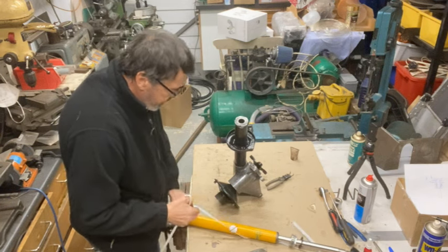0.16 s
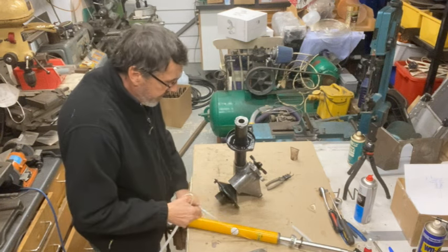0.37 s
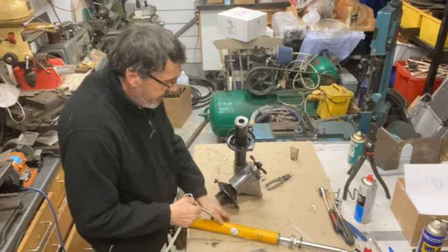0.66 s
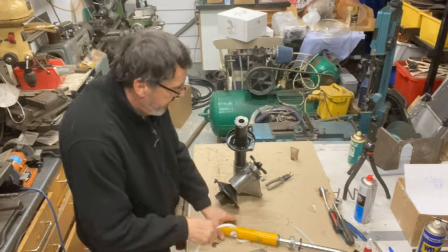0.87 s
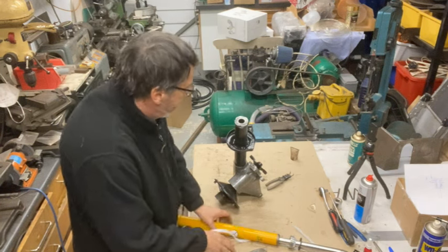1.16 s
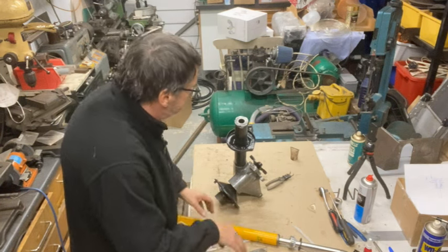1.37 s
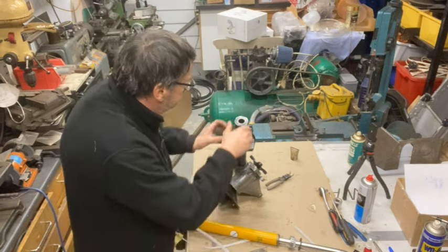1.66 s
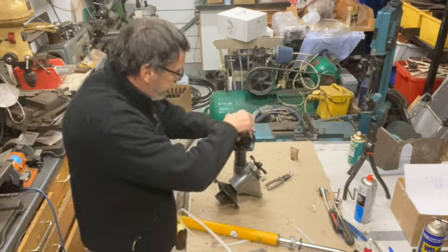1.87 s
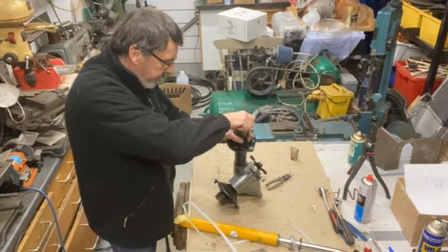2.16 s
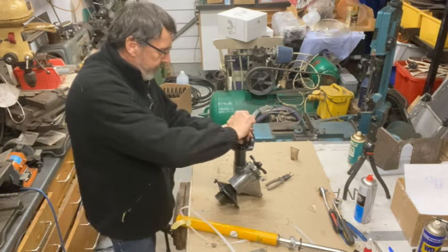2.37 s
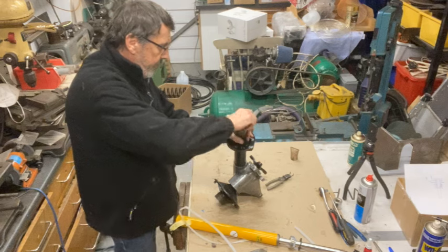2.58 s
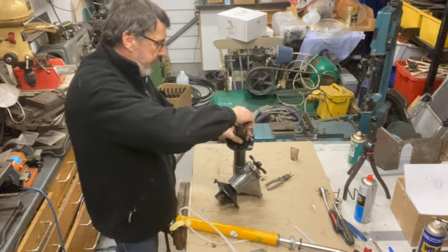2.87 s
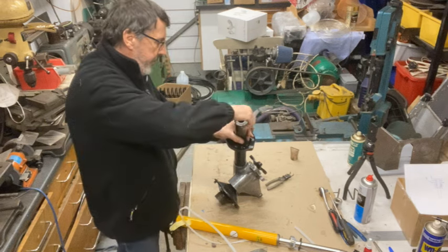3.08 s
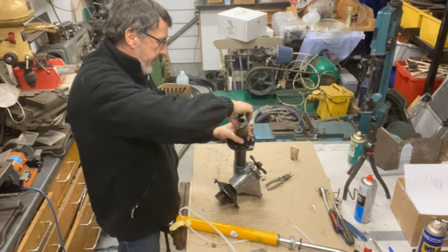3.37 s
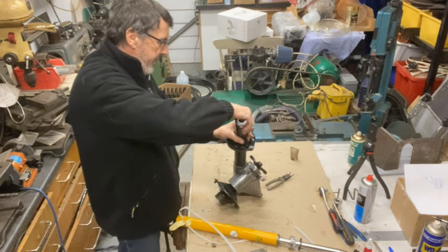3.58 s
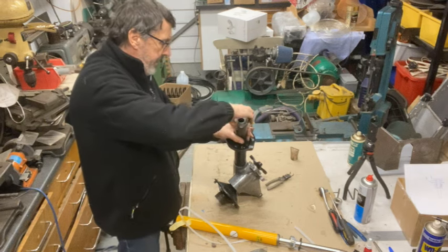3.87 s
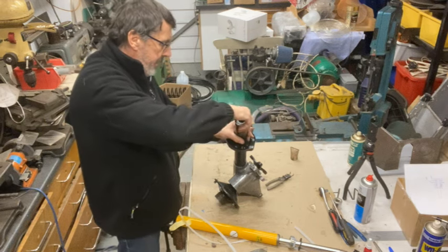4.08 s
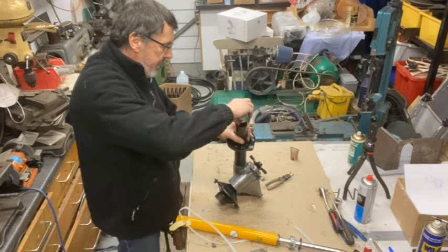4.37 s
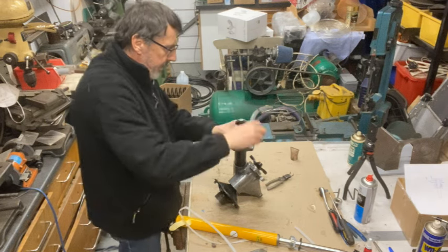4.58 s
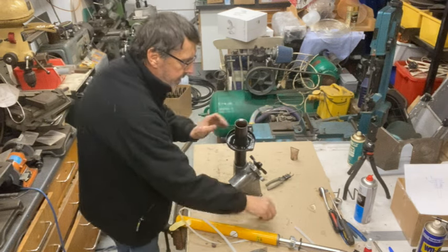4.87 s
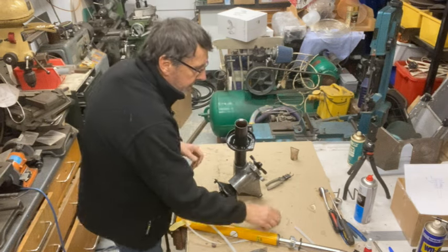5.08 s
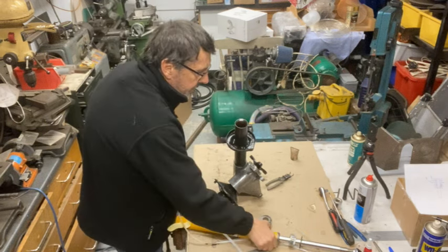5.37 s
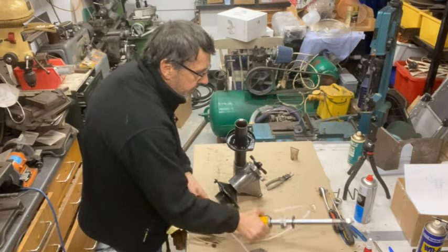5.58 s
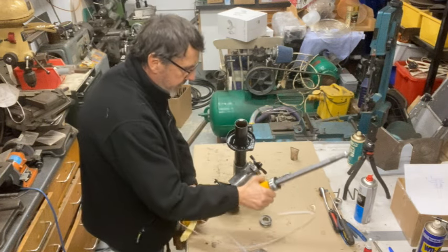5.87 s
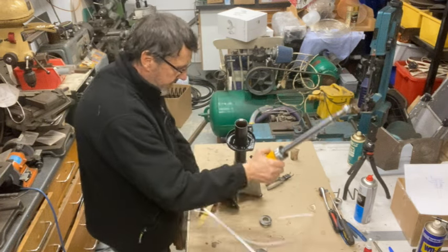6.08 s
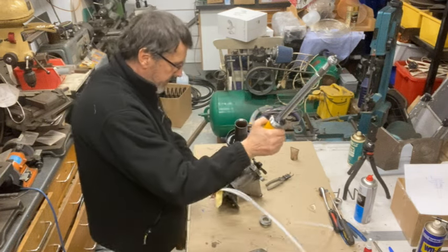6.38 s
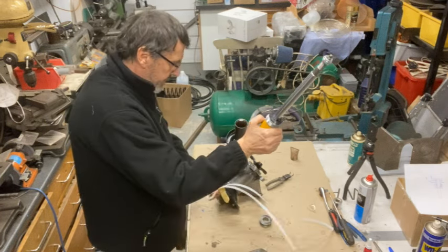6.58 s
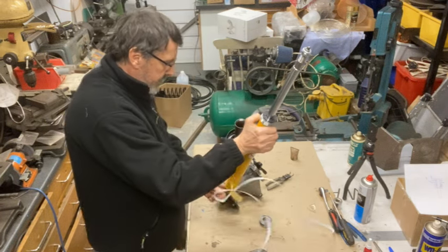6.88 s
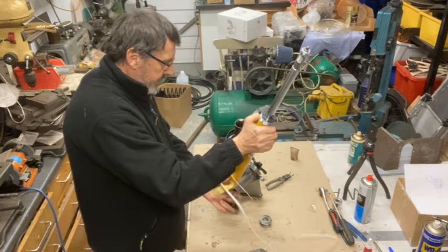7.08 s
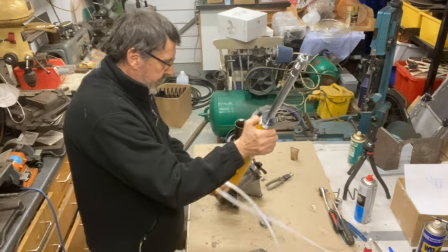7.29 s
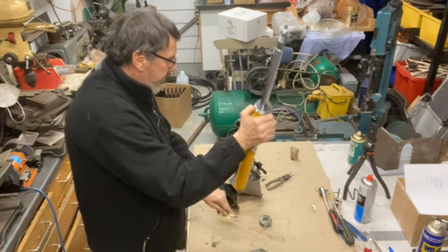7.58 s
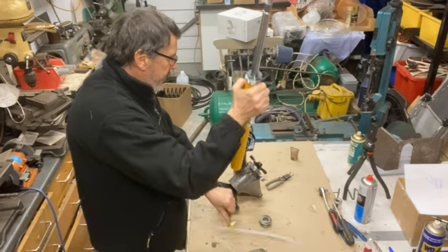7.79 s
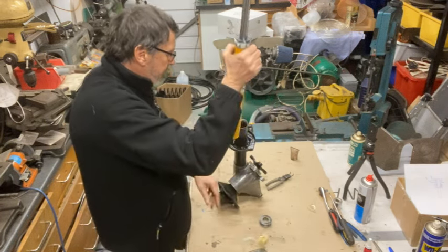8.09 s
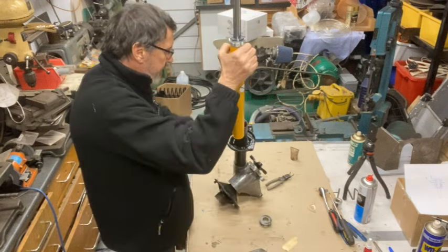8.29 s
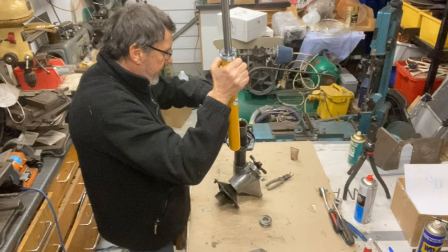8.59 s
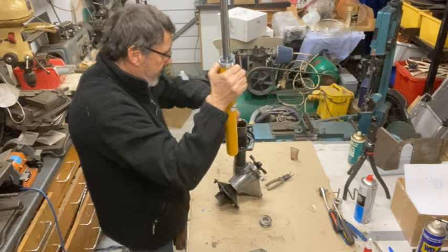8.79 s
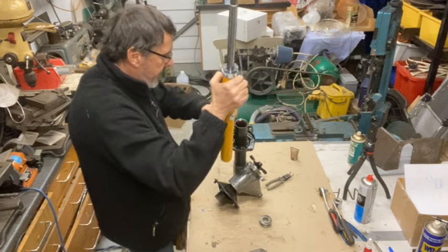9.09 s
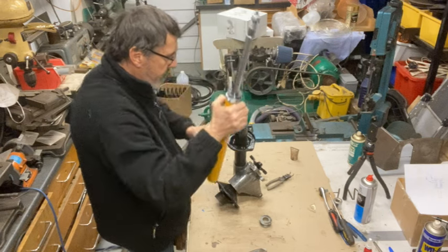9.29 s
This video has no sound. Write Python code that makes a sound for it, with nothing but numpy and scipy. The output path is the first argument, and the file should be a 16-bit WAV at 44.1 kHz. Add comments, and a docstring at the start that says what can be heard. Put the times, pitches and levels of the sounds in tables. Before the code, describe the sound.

In a small cluttered workshop, light taps and metallic rasps give way to a loud burst of clanks, clinks, thumps and gritty sliding.

```python
"""Handling suspension parts on a workbench

Metal parts knock, skid and scuff on a wooden bench: short noise bursts, slides and wooden thumps.
A steel collar rasps down a strut tube, a nut clinks and a damper clanks: fading sine tones ring the metal.
A loose hose scuffs along, grit crackles and tight parts squeak in a small, cluttered workshop.
A low rumble of filtered noise lies under everything."""
import sys
import numpy as np
from scipy import signal
from scipy.fft import rfft, irfft, next_fast_len
from scipy.io import wavfile
from scipy.ndimage import uniform_filter1d

SR = 44100
rng = np.random.default_rng(int(sys.argv[2]) if len(sys.argv) > 2 else 0)


def unload_audio(sound):
    """Save the sound as a 16-bit wav file, at the path given as the first command line argument."""
    columns = np.transpose(np.atleast_2d(sound))
    # keep every value between -1 and 1, then stretch to whole-number steps
    steps = np.round(np.clip(columns, -1, 1) * 32767)
    wavfile.write(sys.argv[1], SR, steps.astype(np.int16))


N = 415863
TIME = np.arange(N) / SR  # clock of the whole scene, in s
RING = np.arange(SR // 2) / SR  # half-second clock of a single hit, in s

# parts and sleeves sliding over the bench, relative levels:
# (start t/s, length/s, grit level/dB, dull rubbing level/dB)
SLIDES = [(0.0, 0.013, -60, -58), (0.106, 0.069, -58.5, -63), (0.249, 0.14, -55, -51.5),
          (0.714, 0.066, -53, -59.5), (0.872, 0.14, -58, -89), (1.069, 0.26, -57, -59.5),
          (2.242, 0.12, -63.5, -57.5), (3.731, 0.28, -78, -50.5), (4.08, 0.15, -75, -43.5),
          (5.25, 0.085, -52, -47.5), (5.345, 0.1, -41.5, -49), (5.445, 0.11, -47, -47.5),
          (5.586, 0.097, -51, -36.5), (5.664, 0.08, -39, -53), (5.783, 0.17, -56, -61.5),
          (6.018, 0.074, -45, -60.5), (6.13, 0.0735, -43, -57), (6.654, 0.067, -58.5, -64.5),
          (6.83, 0.033, -52.5, -69), (6.958, 0.04, -52.5, -49), (7.027, 0.06, -50, -45),
          (7.157, 0.071, -46, -55), (7.43, 0.113, -47.5, -62), (7.66, 0.25, -57.5, -63),
          (8.167, 0.081, -50.5, -48.5), (8.342, 0.21, -55.5, -46.5), (8.582, 0.25, -79, -52),
          (8.888, 0.0072, -49.5, -72), (8.924, 0.16, -49.5, -56), (9.146, 0.33, -69.5, -70.5)]


def knocks(swell_db=-16):
    """A few milliseconds of soft noise swell into each blow; it bounces once; light blows chatter longer."""
    # parts knocking on the bench; hard contacts click, soft ones sound the wood:
    # (t/s, level/dB, hardness/dB, clack f/Hz)
    blows = [(0.14, -32.5, 1, 3020), (0.151, -30, 1, 2730), (0.176, -38, -11, 1200), (0.288, -36, -20, 760),
             (0.399, -41.5, -15, 820), (0.612, -46.5, 1, 1480), (0.647, -44, 15, 1295),
             (0.793, -44.5, 5, 1285), (1.031, -28.5, 10, 2200), (1.046, -26.5, -17, 1400),
             (1.075, -30.5, -10, 1020), (1.080, -21, -8.5, 2200), (1.188, -38.5, 17, 1120),
             (1.241, -43.5, 6, 1210), (1.268, -31, 3, 1390), (1.538, -62.5, -10, 1620),
             (1.627, -57, -7, 895), (4.926, -24, -10.5, 1160), (5.057, -35.5, -7.5, 1150),
             (5.111, -35.5, -9, 1310), (5.199, -22, -1.5, 1540), (5.329, -34, -12, 1140),
             (5.374, -24, 20, 2090), (5.408, -22.5, -5, 1700), (5.577, -20, -24, 905),
             (5.592, -19.5, -21, 734), (5.640, -27, -21, 1305), (5.674, -9.5, 18, 1530),
             (5.848, -28.5, 12, 1280), (5.952, -28.5, -14, 1370), (6.022, -25.5, -21, 1500),
             (6.163, -33.5, 20, 1320), (6.207, -30, 20, 1280), (6.223, -23.5, 0.5, 1830),
             (6.339, -45.5, -8.5, 1610), (6.512, -41, 9, 980), (6.565, -38.5, 9, 1450),
             (6.574, -45, 1, 2310), (6.873, -36.5, 23, 1760), (6.959, -21.5, -15, 1190),
             (7.014, -26, 0, 1510), (7.039, -19, -2, 1180), (7.043, -30.5, -2, 1950), (7.1, -26, -12, 1510),
             (7.104, -24.5, -18, 1880), (7.129, -36, -12.5, 1900), (7.154, -29, -6, 1540),
             (7.222, -32, 14, 1810), (7.402, -17, -0.5, 1340), (7.409, -22.5, -9, 1720),
             (7.491, -32, -18, 1330), (7.521, -29, -1, 1480), (7.560, -14.5, -4, 1440),
             (7.57, -25.5, -16, 1440), (7.595, -30, -3, 2200), (7.667, -33, -3, 1840),
             (7.674, -29.5, 9, 2630), (7.724, -27.5, -1, 990), (7.73, -28, 15, 838),
             (7.781, -34.5, 7, 1550), (7.914, -32.5, 13, 1230), (8.215, -33.5, 16, 1030),
             (8.237, -27, -4, 1000), (8.897, -22, 9, 1230), (8.92, -27.5, 2, 2000)]
    firm_db, firm_decay_s = -25.5, 0.0025
    tenfold_db = 59.5  # a blow this much lighter gets ten times the decay time
    bounce_s, bounce_db, bounce_hardness_db = 0.012, -23, -23  # delay and changes of the softer second touch
    lead_s = 0.004
    out = np.zeros(N)
    lead = np.linspace(0, 1, int(lead_s * SR))
    for s, db, hardness_db, hz in blows:
        decay_s = firm_decay_s * 10 ** ((firm_db - db) / tenfold_db)
        add(out, s, contact(db, hardness_db, hz, decay_s))
        bounce = contact(db + bounce_db, hardness_db + bounce_hardness_db, hz, decay_s)
        add(out, s + bounce_s, bounce)
        soft_noise = band(rng.standard_normal(len(lead)), 900, 7000, order=1)
        add(out, s - lead_s, unit(soft_noise) * lead * undb(db + swell_db))
    return out


def skids():
    """A nudged part grates for a moment before it comes to rest."""
    # parts that skid briefly: (t/s, level/dB, hardness/dB, clack f/Hz)
    nudges = [(0.265, -36, -28, 1390), (0.5, -40, 13, 1380), (0.665, -37, 27.5, 1320),
              (2.075, -47.5, 12, 1960), (2.109, -46.5, -5, 2330), (2.151, -38, -2, 2440),
              (2.323, -39.5, -31, 1490), (8.166, -38.5, -2, 1390), (8.506, -27, -4.5, 1840),
              (8.787, -36.5, 11, 2760)]
    out = np.zeros(N)
    for s, db, hardness_db, hz in nudges:
        add(out, s, contact(db, hardness_db, hz, decay_s=0.012))
    return out


def contact(db, hardness_db, hz, decay_s, click_share_db=-7, clack_share_db=-6, body_share_db=-11):
    """Click, pitched clack and slower wooden body; hardness shares the energy between click and body."""
    hard = undb(hardness_db)
    width = np.clip(0.21 * hz / 1400, .1, .7)  # small, high-pitched contacts are the most damped
    pitched = unit(band(burst(decay_s), hz / (1 + width), hz * (1 + width)))
    broad = unit(band(burst(decay_s), 780, 3400))
    clack = blow(pitched + undb(-2.5) * broad, db + clack_share_db)
    edge = blow(click(decay_s), db + click_share_db)
    body = blow(band(burst(3 * decay_s), 215, 1000, order=3), db + body_share_db)
    return clack + (hard * edge + body) / np.hypot(1, hard)


def click(decay_s, tick_db=15):
    """The bright first touch of a hard edge."""
    touch = undb(tick_db) * (RING == 0) + burst(0.56 * decay_s) + undb(-33.5) * burst(0.011)
    return band(band(touch, 2200, 11000, order=1), 2100, 12000)


def burst(decay_s):
    """Micro-collisions that die away as two surfaces settle; they favour no pitch."""
    fade = np.exp(-RING / max(decay_s, 1 / SR))
    spectrum = rfft(rng.standard_normal(len(RING)) * fade)
    # give all pitches equal strength, then fade again because this smears the noise in time
    even = irfft(spectrum / (np.abs(spectrum) + 1e-12), len(RING)) * fade ** .25
    return even * np.sqrt(np.sum(fade ** 2) / np.sum(even ** 2))


def strut(crack_db=-5, jerk_db=3, catch_db=-3):
    """The collar rasps along its thread in jerks and knocks; the tube rings differently as contact moves."""
    # turns of the collar on its thread: (start t/s, length/s, rasp level/dB, tube ring level/dB)
    turns = [(2.72, 0.076, -59, -84), (2.789, 0.026, -55, -67), (2.85, 0.047, -62.5, -72),
             (3.195, 0.044, -49, -50.5), (3.283, 0.017, -42, -42.5), (3.608, 0.036, -52, -48.5),
             (3.694, 0.044, -45, -45), (4.058, 0.17, -49.5, -46.5)]
    # the collar knocking on the tube: (t/s, level/dB, favoured f/Hz, ring length factor)
    collar_knocks = [(3.19, -45, 2350, 0.85), (3.299, -35.5, 2030, 0.6), (3.322, -44.5, 5370, 0.77),
                     (3.578, -53, 1200, 1.33), (3.645, -40, 1860, 1), (3.709, -40, 2100, 0.65),
                     (3.84, -37, 1190, 0.62), (3.845, -32.5, 1870, 0.76), (4.057, -45, 875, 1.1),
                     (4.133, -31.5, 1210, 0.53), (4.15, -36, 1840, 1.1), (4.198, -32.5, 2130, 1.16),
                     (4.223, -34.5, 1157, 0.92), (4.234, -58, 5300, 1.4)]
    # ringing tones of the tube before the grip changes them: (f/Hz, relative level/dB, 60 dB fade time/s)
    tube = [(294, -4, 0.05), (537, -6.5, 0.1), (875, -7, 0.4), (1157, -1.5, 0.093), (1261, 0, 0.074),
            (1802, -8.5, 0.091), (1853, -1, 0.092), (2066, 1.5, 0.065), (2130, 1.5, 0.062),
            (2300, -6, 0.055), (2960, -3, 0.083), (4255, -1, 0.036), (5300, -11.5, 0.17), (5490, -1, 0.057),
            (6490, -2, 0.042), (9490, -4, 0.049)]
    # tone colour of the rasp: (f/Hz, relative level/dB)
    rasp_colour = [(200, -15), (450, -39), (700, -11), (1100, -1), (1500, -9.5), (2050, 5.5), (2500, 0.5),
                   (3050, -2.5), (3600, -9), (5400, -5.5), (7500, -6), (9500, -6), (13500, -14),
                   (16000, -35)]
    shape = dict(attack_s=0.045, build_db=2.5, release_s=0.061)
    catches = unit(slips(rate=130, spread_db=0.0))  # burrs on the thread make it stutter
    grating = unit(unit(slips(rate=1500, spread_db=1.0)) + undb(catch_db) * catches)
    grating = grating * undb(jerk_db * walk(45))
    rasp_gain = effort([stroke(s, length_s, db, **shape) for s, length_s, db, _ in turns])
    ring_gain = effort([stroke(s, length_s, db, **shape) for s, length_s, _, db in turns])

    def held_tube(grip_ring=0.55, grip_detune=0.014):
        """The hand damps the tube and shifts its tones a little."""
        modes = [(hz * (1 + grip_detune * rng.standard_normal()), db, t60 * grip_ring)
                 for hz, db, t60 in tube]
        return unit(ring(modes, scatter_db=9.0)) / np.sqrt(len(RING))

    rasp = rasp_gain * unit(colour(grating, rasp_colour))
    out = rasp + shifting(grating * ring_gain, held_tube, size=1300)[0]
    for s, db, focus_hz, free in collar_knocks:
        modes = favoured(tube, focus_hz, free, focus_db=11.5)
        rung = signal.fftconvolve(burst(0.0019), ring(modes, scatter_db=2.0))[:len(RING)]
        crack = band(burst(0.0037), 810, 1850, order=1)
        add(out, s, blow(rung, db) + blow(crack, db + crack_db))
    return out


def clinks():
    """The nut rings very high and flutters as it rocks; a grazing touch lets the ring swell more slowly."""
    # a small steel nut clinking and rattling: (t/s, level/dB, swell time constant/s)
    touches = [(5.374, -14.5, 0.0005), (5.418, -28, 0.0012), (5.458, -37.5, 0.002), (5.508, -37.5, 0.0012),
               (5.524, -40.5, 0.0017), (5.546, -45.5, 0.0018), (5.592, -32.5, 0.0025), (5.607, -25, 0.0016),
               (5.643, -34, 0.004), (5.679, -28, 0.00076), (5.70, -30.5, 0.0018), (5.716, -31, 0.002),
               (5.734, -34.5, 0.001), (6.563, -57, 0.00077)]
    # its ringing tones: (f/Hz, relative level/dB, 60 dB fade time/s)
    nut = [(8364, -21, .33), (8376, 0, .1), (9550, -30, .25), (12300, -21, .1), (13940, -22, .11),
           (14160, -21, .14)]
    flutter_db, flutter_per_s = 2, 140
    out = np.zeros(N)
    for s, db, swell_s in touches:
        swell = 1 - np.exp(-RING / max(swell_s, 1 / SR))
        flutter = undb(flutter_db * walk(flutter_per_s)[:len(RING)])
        add(out, s, blow(ring(nut) * swell * flutter, db))
    return out


def damper(tick_db=-9):
    """The damper's steel end chatters on metal: each touch is a tiny click and a short pitched clank."""
    # the steel end meeting other metal: (t/s, level/dB, favoured f/Hz, ring length factor)
    hits = [(5.331, -37, 1100, 1.5), (5.352, -39, 1100, 1), (5.374, -33, 784, 1.2), (5.379, -26, 2240, 1.3),
            (5.392, -29.5, 2330, 1), (5.407, -23.5, 1733, 0.85), (5.452, -33.5, 1532, 0.71),
            (5.456, -30.5, 955, 0.8), (5.462, -35.5, 2310, 0.64), (5.495, -32.5, 1518, 0.73),
            (5.508, -35, 2300, 1.1), (5.553, -32, 955, 1.1), (5.589, -33.5, 4400, 0.65),
            (5.676, -22.5, 1350, 0.68), (6.071, -38.5, 1717, 0.77), (6.16, -38.5, 1350, 0.98),
            (6.226, -35.5, 1717, 1), (6.565, -43, 4420, 1)]
    # its ringing tones before the ring length factor: (f/Hz, relative level/dB, 60 dB fade time/s)
    steel_end = [(786, 0, 0.055), (955, -1, 0.048), (1100, -3, 0.055), (1350, -4, 0.06), (1518, -2, 0.05),
                 (1717, -1, 0.055), (2190, 0, 0.06), (2310, -1, 0.055), (2772, -2, 0.035), (4150, -6, 0.05),
                 (4390, -7, 0.12), (4581, -8, 0.1), (5100, -5, 0.05)]
    out = np.zeros(N)
    for s, db, focus_hz, free in hits:
        clank = ring(favoured(steel_end, focus_hz, free, focus_db=17.5), scatter_db=2.0)
        add(out, s, blow(clank, db) + blow(click(0.001), db + tick_db))
    return out


def ring(modes, scatter_db=0):
    """Fading tones of a struck body; each place of contact weights them a little differently."""
    total = 0
    for hz, db, t60 in modes:
        gain = undb(db + scatter_db * rng.standard_normal())
        fade = np.exp(-np.log(1000) * RING / t60)
        total = total + gain * np.sin(2 * np.pi * hz * RING) * fade
    return total


def favoured(modes, focus_hz, free, focus_db, focus_octaves=0.1):
    """The touched spot favours tones near focus_hz; a looser grip (larger free) lets all ring longer."""
    def boost_db(hz):
        return focus_db * np.exp(-(np.log2(hz / focus_hz) / focus_octaves) ** 2)
    return [(hz, db + boost_db(hz), t60 * free) for hz, db, t60 in modes]


def thumps():
    """A long soft push moves only the lowest bench tones, a short one all; deep bass radiates weakly."""
    # weight landing on the bench top: (t/s, level/dB, push length/s)
    landings = [(1.046, -36, 0.0039), (1.078, -54, 0.0009), (3.317, -42.5, 0.0025), (3.909, -49.5, 0.009),
                (4.937, -31.5, 0.00494), (5.408, -30.5, 0.00558), (5.430, -27.5, 0.0049),
                (5.58, -20.5, 0.00082), (6.963, -33.5, 0.0012), (7.565, -33.5, 0.00074),
                (7.728, -40, 0.0006), (8.215, -38, 0.001)]
    # ringing tones of the bench: (f/Hz, relative level/dB, 60 dB fade time/s)
    bench = [(54, -4, 0.5), (77.72, -8, 0.83), (139.2, -1, 0.26), (152.5, -16, .12), (288.6, 5, 0.21),
             (327, -0.5, 0.061), (418, -16, .12), (482, 2.5, 0.17), (562, 1.5, 0.12), (826, -4, .1),
             (934, -11.5, 0.09)]
    out = np.zeros(N)
    for s, db, push_s in landings:
        push = np.sin(np.pi * np.minimum(RING / push_s, 1))
        board = signal.fftconvolve(push, ring(bench))[:len(RING)]
        add(out, s, blow(band(board, 130, 2000, order=2), db))
    return out


def ticks(decay_s=0.0009, low_hz=3600):
    """Thin bright clicks, alone or at the first touch of a knock."""
    # thin bright clicks: (t/s, level/dB)
    touches = [(0.698, -43), (0.844, -36), (0.877, -37.5), (1.075, -32), (1.079, -43), (1.24, -44.5),
               (1.861, -58), (5.508, -34), (5.731, -33.5), (6.224, -32), (6.745, -44.5), (6.946, -47),
               (7.017, -33), (7.185, -41), (7.353, -43), (7.392, -33), (7.560, -20.5), (7.840, -39),
               (8.903, -30.5), (9.076, -33.5)]
    out = np.zeros(N)
    for s, db in touches:
        add(out, s, blow(band(click(decay_s), low_hz, 11000, order=1), db))
    return out


def scuffing(grit_db=-6, rub_db=-4, jerk_db=5.5, rattle_db=-6):
    """Halting, gritty slides of metal and hose, loose parts rattling, dull rub of hands and sleeves."""
    # tone colour of the gritty slide: (f/Hz, relative level/dB)
    grit_colour = [(300, -23.5), (700, -11), (1400, -17.5), (2200, 0), (3200, 1), (5500, -2.5),
                   (8000, -0.5), (13500, -8.5), (16000, -29)]
    # tone colour of the dull rub: (f/Hz, relative level/dB)
    rub_colour = [(60, -8.5), (110, 7), (180, 2), (300, 0), (400, -9.5), (700, -4), (1200, -10.5),
                  (2500, -20), (8000, -54)]
    shape = dict(attack_s=0.08, build_db=2.5, release_s=0.1)
    grit = unit(colour(slips(rate=710, spread_db=1), grit_colour))
    rub = unit(colour(slips(rate=550, spread_db=3.0), rub_colour))
    rattle_hits = signal.fftconvolve(slips(rate=45, spread_db=2.5), burst(0.0056))[:N]
    rattle = unit(band(rattle_hits, 980, 2300))
    grit_gain = effort([stroke(s, length_s, db, **shape) for s, length_s, db, _ in SLIDES])
    rub_gain = effort([stroke(s, length_s, db, **shape) for s, length_s, _, db in SLIDES])
    jerky_grit = grit * undb(grit_db + jerk_db * walk(60))
    return grit_gain * (jerky_grit + rattle * undb(rattle_db)) + rub * rub_gain * undb(rub_db)


def crackle(crackle_db=-8, crumbs_per_s=39, lowest_hz=2000, spread_db=20.5):
    """Crumbs of grit snap under the sliding parts, each with its own pitch."""
    out = np.zeros(N)
    for s, length_s, db, _ in SLIDES:
        for when, size, pitch in rng.random((int(length_s * crumbs_per_s) + 1, 3)):
            centre_hz = lowest_hz * 2 ** (2 * pitch)  # up to two octaves above the lowest
            snap = band(RING[:SR // 50] == 0, centre_hz / 2, centre_hz * 2, order=1)
            add(out, s + when * length_s, blow(snap, db + crackle_db + spread_db * size ** 2))
    return out


def scrapes(attack_s=0.0058, build_db=-5, release_s=0.034):
    """Steel catching on steel or board: dense slips in one rough resonance, weakening as they go."""
    # scrapes: (start t/s, length/s, level/dB, resonance f/Hz, half-width as a fraction of f)
    catches = [(0.498, 0.028, -60, 1500, 0.17), (0.659, 0.04, -54.5, 1420, 0.15),
               (0.75, 0.017, -51, 2280, 0.13), (0.767, 0.019, -48, 1380, 0.27),
               (2.11, 0.022, -46.5, 2190, 0.32), (2.787, 0.088, -65, 3060, 0.04),
               (5.335, 0.019, -42, 6040, 0.15), (5.673, 0.0095, -23.5, 3600, 0.34),
               (7.031, 0.014, -31.5, 2100, 0.14), (8.896, 0.017, -32.5, 3740, 0.084),
               (8.953, 0.036, -55, 3870, 0.04), (9.055, 0.027, -51.5, 3800, 0.04)]
    out = np.zeros(N)
    for s, length_s, db, hz, width in catches:
        grating = unit(band(slips(rate=2500, spread_db=3.0), hz / (1 + width), hz * (1 + width)))
        out += grating * effort([stroke(s, length_s, db, attack_s, build_db, release_s)])
    return out


def slips(rate, spread_db):
    """Stick-slip: random tiny clicks of uneven size, about rate per second."""
    size = undb(spread_db * np.minimum(rng.exponential(size=N), 4))
    return (rng.random(N) < rate / SR) * size * rng.choice([-1, 1], N)


def stroke(s, length_s, db, attack_s, build_db, release_s, fade_db=28):
    """Level curve of one movement: it sets in, changes by build_db as it goes, and lets go."""
    end = s + length_s
    return [(s - attack_s, db - fade_db), (s, db - build_db / 2),
            (end, db + build_db / 2), (end + release_s, db - fade_db)]


def effort(spans):
    """Gain along level curves, silent between them."""
    gain = np.zeros(N)
    for rows in spans:
        times, db = np.transpose(rows)
        during = slice(*np.searchsorted(TIME, [times[0], times[-1]]))
        gain[during] += undb(np.interp(TIME[during], times, db))
    return gain


def walk(rate):
    """A random level, spread near 1, that glides to a new value every 1 / rate s."""
    size = int(SR / rate)
    steps = np.repeat(rng.standard_normal(N // size + 1), size)
    return 1.22 * uniform_filter1d(steps, size)[:N]  # 1.22 makes up for the smoothing


def squeaks(waver=0.0093, overtone_db=-22, sag=0.012):
    """Rubbing parts lock briefly into a thin, nearly steady tone."""
    # short squeaks: (t/s, length/s, mean f/Hz, level/dB)
    tones = [(6.416, 0.064, 547.3, -61.5), (8.981, 0.026, 678, -36.5), (9.004, 0.021, 690, -37.5),
             (9.03, 0.022, 686, -57), (9.119, 0.022, 703, -42), (9.319, 0.018, 665, -56),
             (9.323, 0.085, 547, -56)]
    out = np.zeros(N)
    for s, length_s, hz, db in tones:
        count = int(length_s * SR)
        drift = unit(uniform_filter1d(rng.standard_normal(len(RING)), SR // 200))[:count]
        pitch_hz = hz * (1 + waver * drift + sag * np.linspace(.5, -.5, count))
        phase = 2 * np.pi * np.cumsum(pitch_hz) / SR
        tone = np.sin(phase) + undb(overtone_db) * np.sin(2 * phase)
        add(out, s, blow(signal.windows.tukey(count, .7) * tone, db))
    return out


def rumble(level_db=-52.5):
    """Steady low rumble of the building with a trace of hiss: noise shaped by frequency."""
    # tone colour of the rumble: (f/Hz, relative level per Hz/dB)
    rumble_colour = [(15, -31.5), (25, -4.5), (62, 5.5), (131, -8), (163, -15.5), (450, -27.5),
                     (558, -26.5), (709, -31.5), (769, -29.5), (1760, -35), (2850, -39), (12800, -46.5),
                     (15000, -51.5)]
    sides = [colour(side, rumble_colour) for side in ports(N, apart_hz=205)]
    return undb(level_db) * unit(np.array(sides))


def workshop(x, wet_db=0, count=0):
    """Direct sound, count samples later on the left, with echoes of bench, clutter and room mixed in."""
    early_t60_s, early_db = 0.18, -5.5  # bench and clutter
    room_t60_s, room_db = 0.23, 4.5
    swell = 1 - np.exp(-RING / 0.00054)
    early = np.exp(-np.log(1000) * RING / early_t60_s) * swell
    late = np.exp(-np.log(1000) * RING / room_t60_s) * swell
    fade = np.hypot(undb(early_db) * unit(early), undb(room_db) * unit(late)) / np.sqrt(len(RING))

    def response():
        """One source position's path to both microphones."""
        path = unit(ports(len(RING), apart_hz=340)) * fade * undb(wet_db)
        path[[0, 1], [count, 0]] += 1  # the direct sound
        return path
    return shifting(x, response, size=SR // 3)


def ports(count, apart_hz):
    """Diffuse noise at two close microphones: alike in the bass, unrelated in the treble."""
    mid, side = rng.standard_normal((2, count))
    side = 0.92 * signal.sosfilt(signal.butter(1, apart_hz, "high", fs=SR, output="sos"), side)
    return np.array([mid + side, mid - side])


def shifting(x, response, size):
    """Convolve with a path drawn anew every size samples, as the point of contact moves."""
    out = np.zeros((len(np.atleast_2d(response())), N))
    for start in range(0, N, size):
        piece = x[start:start + size]
        if piece.any():
            for track, path in zip(out, np.atleast_2d(response())):
                add(track, start / SR, signal.fftconvolve(piece, path))
    return out


def lean(left_db):
    """Channel gains that favour the left by left_db."""
    return undb(np.array([[left_db], [-left_db]]) / 2)


def undb(db):
    """Decibels to gain."""
    return 10 ** (np.asarray(db) / 20)


def unit(x):
    """Scale to rms (average strength) 1."""
    return x / np.sqrt(np.mean(x ** 2))


def blow(x, db):
    """Scale a hit so that its loudest 10 ms have this rms level."""
    return x * undb(db) / np.sqrt(uniform_filter1d(x ** 2, SR // 100).max())


def add(track, s, x):
    """Mix x into the track from time s on."""
    start = max(int(s * SR), 0)
    track[start:start + len(x)] += x[:max(N - start, 0)]


def band(x, lo_hz, hi_hz, order=2):
    """Keep only the pitches between two limits."""
    limits = [lo_hz, min(hi_hz, SR / 2 - 100)]
    return signal.sosfilt(signal.butter(order, limits, "band", fs=SR, output="sos"), x)


def colour(x, points):
    """Shape a sound by (f/Hz, level/dB) points."""
    hz, db = np.transpose(points)
    size = next_fast_len(len(x))
    bins = np.arange(size // 2 + 1) * SR / size
    gain = undb(np.interp(np.log(bins + 1), np.log(hz), db))
    return irfft(rfft(x, size) * gain, size)[:len(x)]


def scene():
    """All but the rumble share the room; light and ringing sounds are more direct, bass leans right."""
    handling = workshop(knocks() + skids() + scuffing() + scrapes(), wet_db=-1, count=4)
    collar = workshop(strut(), wet_db=-3, count=3)
    light = workshop(ticks() + crackle() + damper(), wet_db=-9, count=3)
    rings = workshop(clinks(), wet_db=-15)
    squeaking = workshop(squeaks(), wet_db=-2.5, count=3)
    bench_bass = lean(-4.5) * workshop(thumps(), wet_db=-15, count=6)
    background = lean(-2.5) * rumble()
    return handling + collar + light + rings + squeaking + bench_bass + background


def record(dry):
    """The microphone sheds deep bass and has a treble notch; loud peaks are rounded and the top is cut."""
    # tone colour of the microphone: (f/Hz, level/dB)
    microphone = [(22, -21.0), (40, -3.5), (6000, 0.5), (7700, 2.5), (9200, 0.5), (9900, -6.5),
                  (10500, -22.0), (11400, -2.0), (12500, 1.5), (14300, 1.5), (15000, -6.0), (16000, -24.0)]
    top_hz = 16400
    heard = np.tanh(np.array([colour(side, microphone) for side in dry]))
    return signal.sosfilt(signal.ellip(8, .2, 70, top_hz, fs=SR, output="sos"), heard)


dry = scene()
out = record(dry)
unload_audio(out)
```